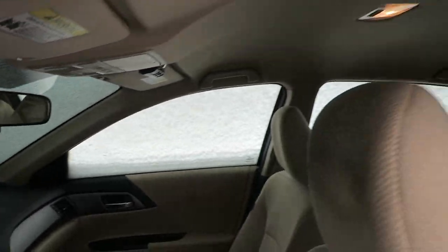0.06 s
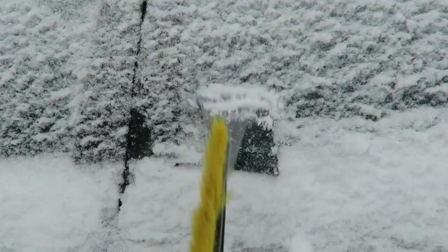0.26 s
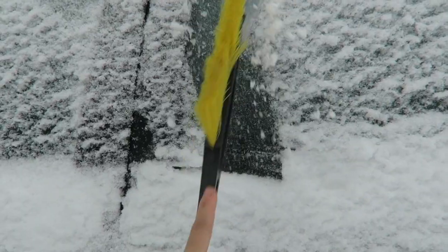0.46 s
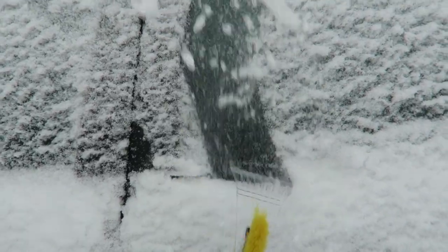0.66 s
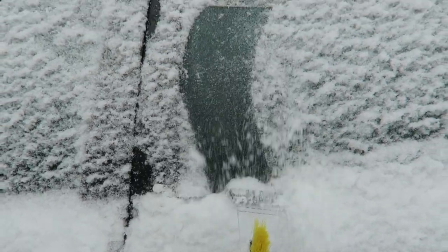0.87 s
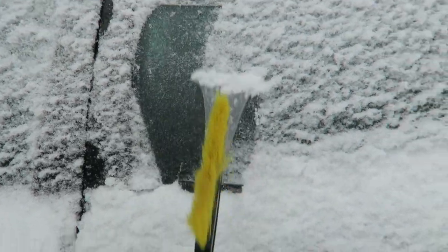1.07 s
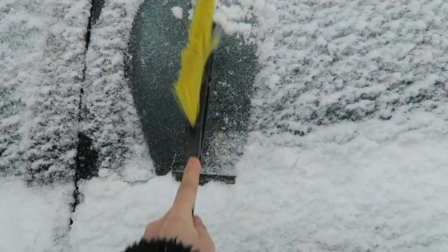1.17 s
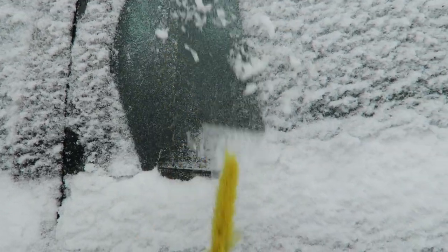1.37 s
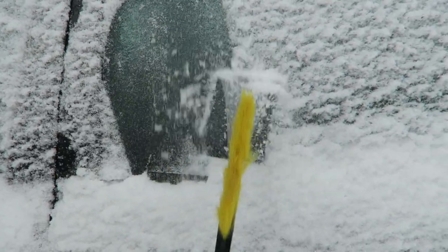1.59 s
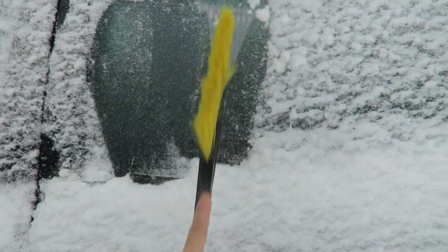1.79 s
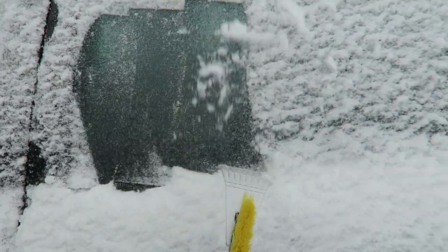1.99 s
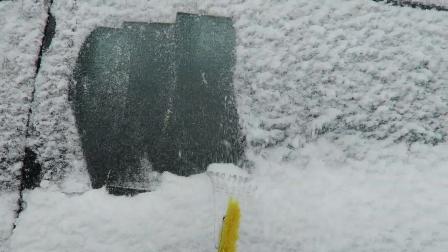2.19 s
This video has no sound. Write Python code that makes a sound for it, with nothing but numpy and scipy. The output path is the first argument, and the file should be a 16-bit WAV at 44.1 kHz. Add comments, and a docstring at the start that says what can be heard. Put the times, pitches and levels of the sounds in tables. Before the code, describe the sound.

A plastic scraper rasps across a frosty car window in three back-and-forth strokes.

```python
"""A plastic scraper clears frost from a car's side window in three push-and-pull strokes.
A soft, low background wash is louder at first, then sinks; an idling engine joins and loose snow slides.
Each push lands with a knock, judders through the crust and smooths into a rasp, as countless tiny
ice fractures ring the blade (treble) and the pane (bass and middle). A lighter pull follows; at speed,
friction makes the blade sing. Late on, puffs of wind rumble, and a last knock and ice crack close."""
import sys
import numpy as np
from scipy import signal
from scipy.fft import rfft, irfft
from scipy.io import wavfile

SR = 44100
rng = np.random.default_rng(int(sys.argv[2]) if len(sys.argv) > 2 else 0)


def put_to_file(sound):
    """Save the sound as 16-bit audio at rate SR, in the file named by the first command-line argument."""
    columns = np.atleast_2d(sound).T  # one column per channel
    safe = np.clip(columns, -1, 1)
    whole_steps = np.round(safe * 32767)
    wavfile.write(sys.argv[1], SR, whole_steps.astype(np.int16))


N = 99225
T = np.arange(N) / SR
GRAINS_PER_S, GRAIN_SPREAD_DB = 5000, 2

# Blade motion, one list per stroke: t/s, speed as a level/dB, load on the pane/dB
PUSH_STROKES = [
    [(0.25, -41, -19), (0.256, -45, -25), (0.264, -37, -19), (0.288, -32, -15.5), (0.294, -35.5, -20.5),
     (0.414, -27.5, -24), (0.47, -35, -25), (0.49, -52.5, -56)],
    [(1.0, -59, -33), (1.026, -41.5, -22.5), (1.038, -39, -24), (1.054, -40, -28), (1.066, -31, -18.5),
     (1.226, -28.5, -21.5), (1.28, -36, -28.5), (1.297, -52, -42)],
    [(1.518, -62, -29), (1.53, -47.5, -31), (1.672, -27.5, -20.5), (1.738, -29.5, -22.5),
     (1.79, -32, -21.5), (1.806, -40.5, -33), (1.82, -54, -52)],
]
PULL_STROKES = [
    [(0.495, -55, -68), (0.521, -35.5, -35.5), (0.591, -26, -30.5), (0.621, -32, -24.5),
     (0.713, -37.5, -24), (0.77, -73, -46.5)],
    [(1.3, -50, -41), (1.324, -33, -28), (1.34, -31, -31), (1.348, -26.5, -27), (1.436, -34, -25),
     (1.486, -39.5, -27), (1.512, -58, -44.5)],
    [(1.822, -64, -54), (1.832, -38, -37.5), (1.876, -27.5, -30), (1.918, -31, -24.5), (1.998, -38, -26.5),
     (2.046, -63.5, -46), (2.06, -102, -62)],
]
# Resonances of the blade and of the ice crust: f/Hz, bandwidth/Hz, lift/dB
BLADE_MODES = [(2540, 100, -3), (3150, 106, 7.5), (3900, 21, -18.5), (4363, 105, 2), (4915, 130, 4.5),
               (5450, 120, 2), (6034, 73, 4), (6540, 96, 5), (7130, 285, 7.5), (8720, 160, 2.5),
               (10690, 300, 5.5), (11360, 340, 4.5), (12600, 200, 3.5), (13300, 90, 8), (15080, 110, 6)]
ICE_MODES = [(351.5, 33, 4), (720, 45, 2), (787, 15, -7), (956, 53, 1.5), (6210, 190, 13)]
# Spectrum of the engine's rumble: f/Hz, level/dB
RUMBLE_SPECTRUM = [(22, -21), (55, -2), (80, -19), (120, -7.5), (200, -19), (400, -15), (1500, -27.5),
                   (8000, -70)]


def from_db(db):
    """Amplitude ratio of a level in decibels."""
    return 10 ** (np.asarray(db) / 20)


def unit_rms(x):
    """Normalisation to unit mean power."""
    return x / np.sqrt(np.mean(x ** 2) + 1e-20)


def colour(x, spectrum):
    """Minimum-phase filtering with unit energy, along a spectrum of rows f/Hz, level/dB."""
    size = 2 ** 17
    hz, db = np.transpose(spectrum)
    grid_hz = np.maximum(np.arange(size // 2 + 1) * SR / size, 1)
    magnitude = from_db(np.interp(np.log(grid_hz), np.log(hz), db))
    cepstrum = irfft(np.log(magnitude))
    cepstrum[1:size // 2] *= 2  # folding onto positive time makes the filter causal
    cepstrum[size // 2 + 1:] = 0
    response = np.exp(rfft(cepstrum))
    return irfft(rfft(x, size) * response / np.sqrt(np.mean(abs(response) ** 2)))[:N]


def drift(rate_hz):
    """Low-passed noise gives a smooth random fluctuation of unit rms."""
    step = 20
    r = np.exp(-2 * np.pi * rate_hz * step / SR)
    noise = rng.standard_normal((N + SR) // step)
    slow = signal.lfilter([1], [1, -2 * r, r * r], noise)[SR // step:]
    return np.interp(np.arange(N) / step, np.arange(len(slow)), unit_rms(slow))


def swells(rows):
    """Sum of Gaussian envelopes, from rows t/s, half-width/s, level/dB."""
    return sum(from_db(db) * np.exp(-((T - t) / half) ** 2) for t, half, db in rows)


def resonance(x, hz, width_hz):
    """A damped second-order resonator with unit gain at its peak."""
    r = np.exp(-np.pi * width_hz / SR)
    numerator = np.array([1, 0, -1]) * (1 - r * r) / 2
    return signal.lfilter(numerator, [1, -2 * r * np.cos(2 * np.pi * hz / SR), r * r], x + 1e-18)


def resonate(x, modes, wander_db=0):
    """A body lifts the bands at its modes; their strengths wander if the contact moves."""
    for hz, width_hz, lift_db in modes:
        x = x + from_db(lift_db + wander_db * drift(8.3)) * resonance(x, hz, width_hz)
    return x


def fractures(per_s, spread_db):
    """Shot noise of brittle fracture: independent impulses, many small and a few large."""
    sizes = from_db(spread_db * np.minimum(rng.exponential(1, N), 5))
    return unit_rms(sizes * rng.choice([-1, 1], N) * (rng.random(N) < per_s / SR))


def background_wash():
    """Broadband noise: a soft, low wash, louder at first, then sinking."""
    spectrum = [(25, -3.5), (60, -8.5), (110, -7.5), (200, -0.5), (380, 2.5), (550, -8), (1100, -5.5),
                (2000, -13.5), (4000, -30.5), (8000, -42), (12000, -50), (16000, -75)]  # background wash: f/Hz, level/dB
    envelope = [(0, -36.5), (.1, -36.5), (.22, -36), (.4, -38.5), (.8, -43), (.96, -44.5), (2.08, -44.5),
                (2.25, -44)]  # its course: t/s, level/dB
    return colour(rng.standard_normal(N), spectrum) * from_db(np.interp(T, *np.transpose(envelope)))


def air_hiss():
    """The air's faint hiss is high-band noise under a slow amplitude envelope."""
    spectrum = [(1500, -28), (3500, 1.5), (6000, -4.5), (9000, -9.5), (12000, -9), (13500, -24),
                (16000, -49)]  # hiss: f/Hz, level/dB
    envelope = [(0, -62), (.12, -59), (.22, -50), (.78, -63), (.9, -63), (.97, -72), (2.06, -61.5),
                (2.25, -68.5)]  # its course: t/s, level/dB
    return colour(rng.standard_normal(N), spectrum) * from_db(np.interp(T, *np.transpose(envelope)))


def idling_engine():
    """A nearly periodic source gives harmonics of its cycle rate, here over a noisy rumble."""
    orders = [(1, -43), (2, -52.5), (3, -51), (9, -57)]  # engine harmonics: multiple, level/dB
    idle_hz, waver = 44.9, 0.0038
    cycles = np.cumsum(idle_hz * (1 + waver * drift(2.34))) / SR
    hum = sum(from_db(db) * np.sqrt(2) * np.sin(2 * np.pi * (order * cycles + rng.random()))
              for order, db in orders)
    rumble = from_db(-57) * colour(rng.standard_normal(N), RUMBLE_SPECTRUM)
    fade_in = np.clip((T - 0.2) / 0.015, 0, 1)
    return fade_in * (hum + rumble)


def loose_snow():
    """Crumbs slide down the glass; their many small impulses merge into a faint rustle."""
    slides = [(.225, 0.019, -42.5), (.80, 0.11, -52)]  # sliding snow: t/s, half-width/s, level/dB
    spectrum = [(1200, -10), (2800, -4), (3900, 1), (5500, -9), (8000, -11), (12000, -14), (16000, -36)]  # rustle: f/Hz, level/dB
    return swells(slides) * colour(fractures(GRAINS_PER_S, GRAIN_SPREAD_DB), spectrum)


def pane(force):
    """Modal superposition: the framed glass answers a force with decaying low sinusoids."""
    modes = [(87, -13, .1), (112, 0.5, 0.13), (147, -3.5, .1), (171.7, -6, 0.14), (231.5, -4.5, 0.1),
             (373.5, -2, 0.037)]  # pane modes: f/Hz, level/dB, time to decay by 60 dB/s
    out = 0
    for hz, db, t60 in modes:
        r, w = 1000 ** (-1 / (t60 * SR)), 2 * np.pi * hz / SR
        ring = signal.lfilter([0, np.sin(w)], [1, -2 * r * np.cos(w), r * r], force + 1e-18)
        out = out + from_db(db) * ring
    return out


def knocks():
    """Impact excitation: the blade strikes the glass with a click, a crumble of ice and a thud."""
    impacts = [(0.225, -19, 12), (.251, 0, 5.5), (0.2539, -7.5, -15), (0.2769, -4.5, -30), (0.287, -4.5, 9),
               (.8455, -14.5, 9), (.851, -17.5, 1), (0.856, -20, 21.5), (0.9008, -27.5, 10),
               (1.002, -17, -5), (1.019, -19, -21), (1.022, -9, -17), (1.044, -5.5, -14), (1.052, -4.5, -3),
               (1.530, -10, -6), (1.541, -9.5, 11), (1.565, -20, 22.5), (1.58, -3, 14.5),
               (1.596, -11.5, -12), (2.146, -20.5, 16)]  # blade on glass: t/s, level/dB, thud relative to that level/dB
    crumble_s = 0.0039
    clicks, thuds, crumble = np.zeros((3, N))
    for t, db, thud_db in impacts:
        clicks[int(t * SR)] += from_db(db)
        thuds[int(t * SR)] += from_db(db + thud_db)
        crumble += from_db(db) * (T >= t) * np.exp(-abs(T - t) / crumble_s)
    force = clicks + 0.089 * crumble * rng.standard_normal(N)
    ringing = resonate(resonate(force, BLADE_MODES), ICE_MODES)
    spectrum = [(50, 5.5), (150, -5), (280, -13), (500, 5), (740, 7.5), (1000, -0.5), (1500, -1.5),
                (2000, -4.5), (3000, -8.5), (5000, -17), (6500, -29.5), (9000, -28), (16000, -32)]  # knock: f/Hz, level/dB
    return from_db(5) * colour(ringing, spectrum) + from_db(-28) * pane(thuds)


def edge_echo(x):
    """Comb filtering: a reflection from the pane's edge arrives later as the blade travels up."""
    near_s, far_s = 0.0031, 0.0042
    turns = []
    for up, down in zip(PUSH_STROKES, PULL_STROKES):
        turns += [(up[0][0], near_s), (down[0][0], far_s), (down[-1][0], near_s)]
    delay_s = np.interp(T, *np.transpose(sorted(turns)))
    return x + 0.19 * np.interp(T - delay_s, T, x)


def scrape(strokes, pane_spectrum, pane_modes, pane_db, rasp_db, hiss_db, rasp_exponent, rough_db):
    """Source and filter: ice grains break; speed sets the blade's rasp and hiss, load drives the pane."""
    rasp_spectrum = [(1200, -3.5), (1900, -2), (2200, 2), (2800, 2.5), (3500, -1), (4200, -2.5), (5600, -2),
                     (6500, -5), (8000, -21.5)]  # blade's rasp: f/Hz, level/dB
    hiss_spectrum = [(5000, -19), (6900, 8), (8000, 4), (9000, 5.5), (9600, -1.5), (11500, -3),
                     (12600, -9.5), (13100, -8.5), (14500, -11), (16000, -24.5)]  # blade's hiss: f/Hz, level/dB
    full_speed_db, landing_s, lift_s = -29, 0.0024, 0.0098
    times, speeds, loads = np.vstack(strokes).T
    speed_db = np.interp(T, times, speeds) - full_speed_db
    load_db = np.interp(T, times, loads)
    contact = sum(np.clip(np.minimum((T - rows[0][0]) / landing_s, (rows[-1][0] - T) / lift_s) + 1, 0, 1)
                  for rows in strokes)
    grains = fractures(GRAINS_PER_S, GRAIN_SPREAD_DB)
    powder = 0.47 * rng.standard_normal(N)
    force = edge_echo((grains + powder) * from_db(rough_db * drift(77)))
    blade = resonate(force, BLADE_MODES, wander_db=4.5)
    glass = resonate(force, pane_modes, wander_db=4.5)
    body = unit_rms(colour(glass, pane_spectrum)) * from_db(pane_db + load_db)
    rasp = unit_rms(colour(blade, rasp_spectrum)) * from_db(rasp_db + rasp_exponent * speed_db)
    hiss = unit_rms(colour(blade, hiss_spectrum)) * from_db(hiss_db + speed_db)
    return contact * (body + rasp + hiss)


def pushes():
    """Forced vibration under heavy load: the pushed blade drives the pane down into the bass."""
    spectrum = [(50, -5), (150, 3.5), (225, 0), (340, -5), (470, -1), (550, 1), (720, 0.5), (950, 0.5),
                (1260, 1.5), (1600, -7), (1790, -11), (1950, -16.5), (2600, -61.5)]  # pane under a push: f/Hz, level/dB
    modes = [(234.5, 19, 0.5), (325, 40, 2.5), (384.8, 11.6, 11), (1296, 210, -17.5), (1760, 60, 2.5)]  # its resonances: f/Hz, bandwidth/Hz, lift/dB
    return scrape(PUSH_STROKES, spectrum, modes,
                  pane_db=-3.5, rasp_db=-25, hiss_db=-29, rasp_exponent=0.96, rough_db=1.07)


def judder():
    """Stick-slip: coarse slips through the crust shake blade and pane early in each push."""
    bites = [(0.263, 0.053, -28.5, -26), (1.049, 0.066, -22, -28), (1.533, 0.11, -21.5, -27)]  # blade biting in: t/s, duration/s, crunch level/dB, thud level/dB
    spectrum = [(40, -28), (90, 11), (200, 2.5), (380, -3.5), (490, -14.5), (620, 2.5), (740, 5),
                (880, -4.5), (1300, -7), (1700, -43), (1950, -37), (2400, -11), (3400, -10.5), (6400, -31),
                (8000, -45), (16000, -55)]  # crunch: f/Hz, level/dB
    attack_s, release_s = 0.014, 0.037
    slips = fractures(per_s=700, spread_db=1.5)
    ringing = resonate(resonate(slips, BLADE_MODES), ICE_MODES)
    crunch = unit_rms(colour(ringing, spectrum))
    thud = unit_rms(pane(slips))
    out = 0
    for t, length, crunch_db, thud_db in bites:
        force = np.clip((T - t) / attack_s, 0, 1) * np.exp(-np.maximum(T - t - length, 0) / release_s)
        out = out + force * (from_db(crunch_db) * crunch + from_db(thud_db) * thud)
    return out


def ice_cracks():
    """Impulse response: each bit of ice that snaps rings the blade once."""
    snaps = [(0.276, -1), (.2862, -1.5), (0.8453, -33), (0.856, -33), (0.902, -31), (1.568, -25),
             (2.147, -25), (2.172, -31)]  # snapping ice: t/s, level/dB
    spectrum = [(300, -46), (1200, -14), (2000, 11), (2800, 11), (4500, 1), (6500, -3), (8000, -21),
                (16000, -22)]  # crack: f/Hz, level/dB
    impulses = sum(from_db(db) * (np.arange(N) == int(t * SR)) for t, db in snaps)
    return colour(resonate(impulses, BLADE_MODES), spectrum)


def blade_singing():
    """Friction feeds one blade mode into a narrow-band tone, which fades when the blade is slow."""
    notes = [(.40, 0.023, 4850, -27), (0.594, 0.016, 3190, -23.5), (0.672, 0.075, 3150, -29.5),
             (1.161, 0.03, 3150, -25), (1.397, 0.055, 3140, -32), (1.626, 0.022, 3210, -25.5),
             (1.898, 0.037, 4876, -27.5), (1.925, 0.039, 3170, -24)]  # singing modes: t/s, half-width/s, f/Hz, level/dB
    width_hz, fade_below_db = 140, -34
    out = 0
    for t, half, hz, db in notes:
        band = resonance(rng.standard_normal(N), hz, width_hz)
        band = resonance(band, hz, 2 * width_hz)
        tone = band / np.sqrt(abs(signal.hilbert(band)) + 1e-9)  # partly evens out the amplitude
        out = out + swells([(t, half, db)]) * unit_rms(tone)
    motion = np.vstack([*PUSH_STROKES, *PULL_STROKES])
    times, speeds, _ = np.transpose(sorted(map(tuple, motion)))
    return out * from_db(np.minimum(np.interp(T, times, speeds) - fade_below_db, 0))


def pulls():
    """Forced vibration under light load: the returning blade draws less bass from the pane."""
    spectrum = [(50, -49), (165, -2.5), (250, 0.5), (330, 3), (460, 0), (580, -0.5), (790, -3.5), (1030, 0),
                (1200, -0.5), (1450, -7), (1800, -10), (2600, -59)]  # pane under a pull: f/Hz, level/dB
    modes = [(318, 82, -9), (594, 46, 1), (652, 44, 6.5), (1235, 160, 1), (2490, 100, 19)]  # its resonances: f/Hz, bandwidth/Hz, lift/dB
    return scrape(PULL_STROKES, spectrum, modes,
                  pane_db=0, rasp_db=-24, hiss_db=-27.5, rasp_exponent=0.76, rough_db=1.0)


def wind_puffs():
    """Turbulence: puffs of wind give low buffeting, uncorrelated between left and right."""
    puffs = [(1.58, 0.039, -37), (2.11, 0.095, -42), (2.2, 0.057, -37)]  # gusts: t/s, half-width/s, level/dB
    spectrum = [(25, -24), (70, 1), (130, -5), (220, -6.5), (400, -22), (1500, -61), (8000, -86)]  # buffeting: f/Hz, level/dB
    return swells(puffs) * np.array([colour(noise, spectrum) for noise in rng.standard_normal((2, N))])


def scene():
    """Mid-side sum: nearly central, with a wide rumble and faint, fluttering width during the strokes."""
    width_spectrum = [(40, -27), (150, -11), (350, 11), (650, 19), (1000, -13), (1500, -37), (2500, -47),
                      (15000, -34)]  # low-mid stereo width: f/Hz, level/dB
    scraping = pushes() + pulls()
    scraper = scraping + blade_singing() + judder() + knocks() + ice_cracks() + loose_snow()
    scraper = signal.sosfilt(signal.butter(2, 71, "high", fs=SR, output="sos"), scraper)
    flutter = from_db(-42.5) * colour(scraping * drift(72), width_spectrum)
    wide_rumble = from_db(-57) * colour(rng.standard_normal(N), RUMBLE_SPECTRUM)
    side = (flutter + wide_rumble) * np.array([[1], [-1]])
    return scraper + background_wash() + idling_engine() + air_hiss() + wind_puffs() + side


def record(dry):
    """Soft saturation rounds the highest peaks; a steep low-pass filter removes the top treble."""
    ceiling, cutoff_hz = 0.68, 15750
    rounded = dry / (1 + (dry / ceiling) ** 4) ** 0.25
    return signal.sosfilt(signal.ellip(12, 0.1, 90, cutoff_hz, fs=SR, output="sos"), rounded)


dry = scene()
out = record(dry)
put_to_file(out)
```